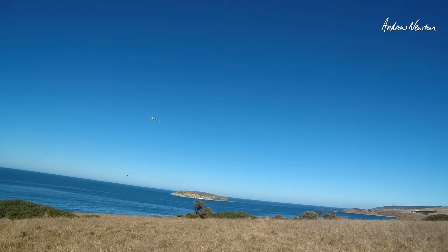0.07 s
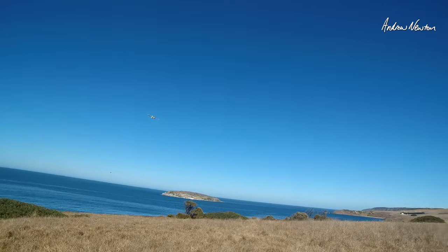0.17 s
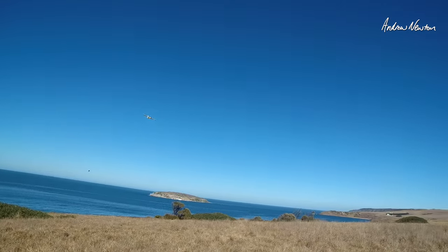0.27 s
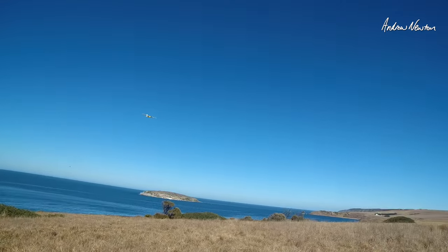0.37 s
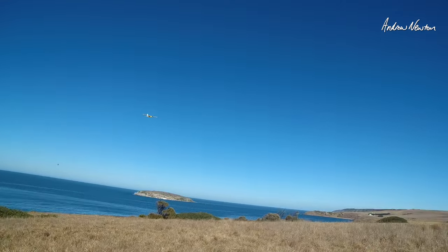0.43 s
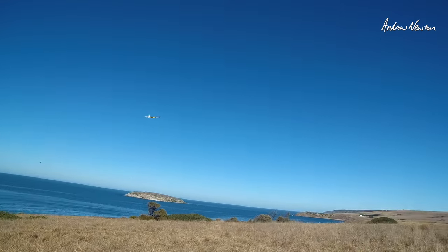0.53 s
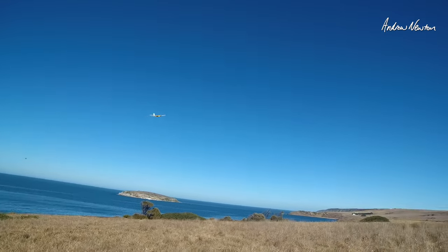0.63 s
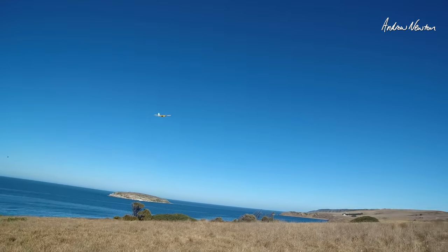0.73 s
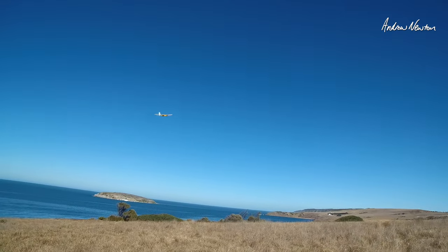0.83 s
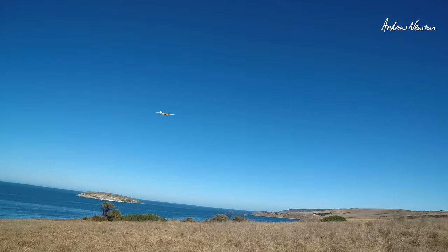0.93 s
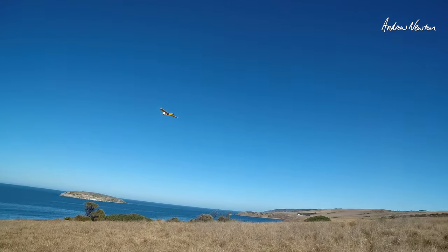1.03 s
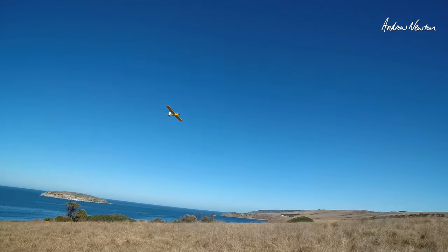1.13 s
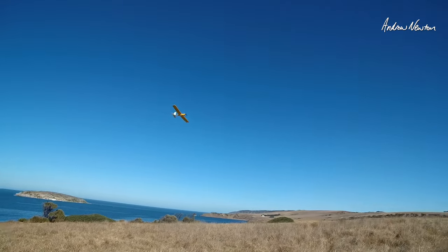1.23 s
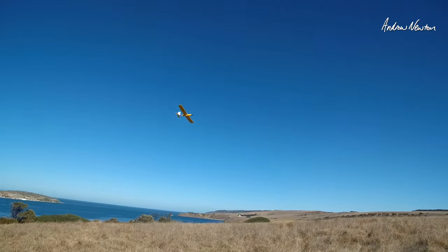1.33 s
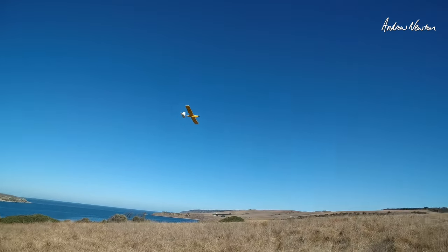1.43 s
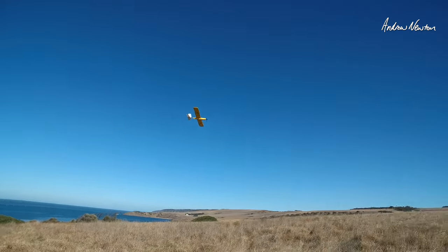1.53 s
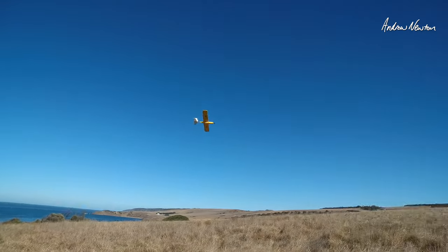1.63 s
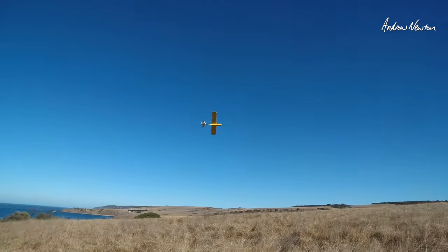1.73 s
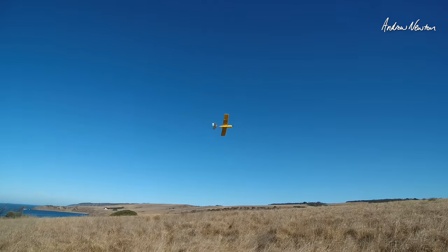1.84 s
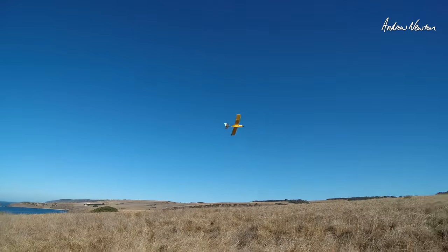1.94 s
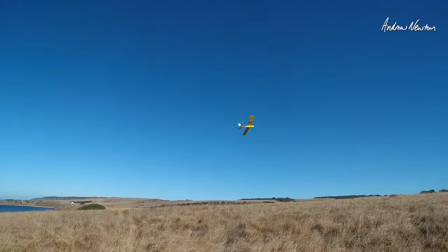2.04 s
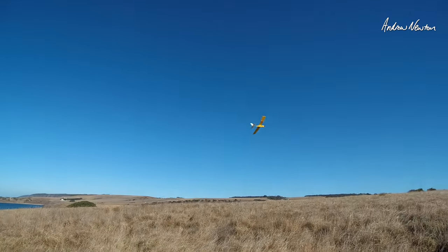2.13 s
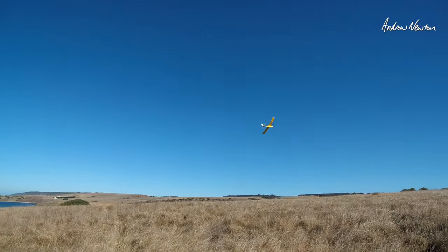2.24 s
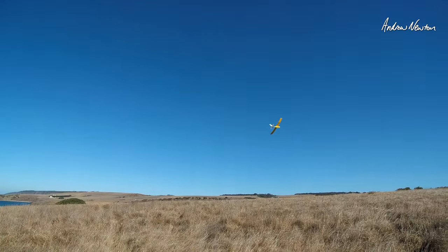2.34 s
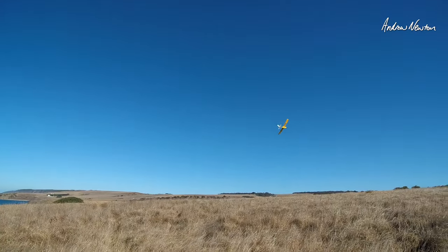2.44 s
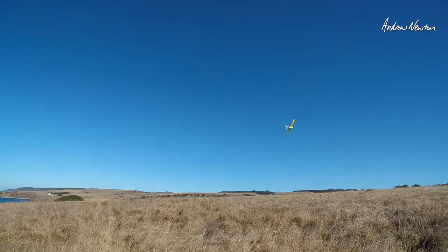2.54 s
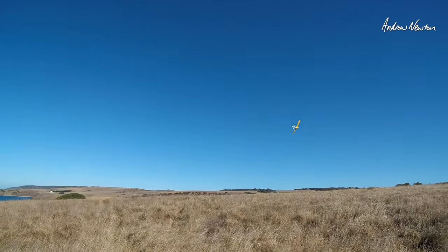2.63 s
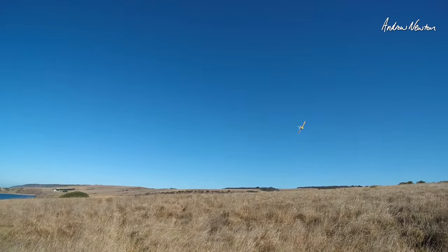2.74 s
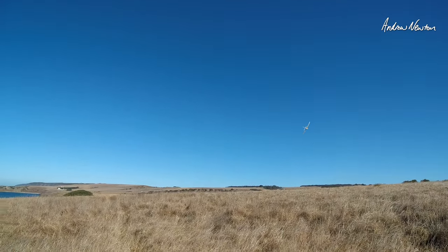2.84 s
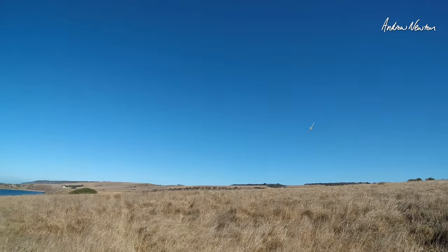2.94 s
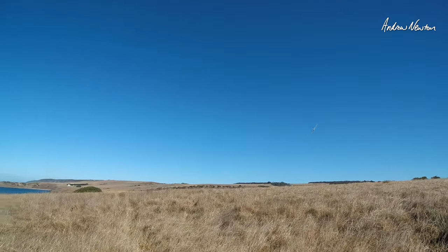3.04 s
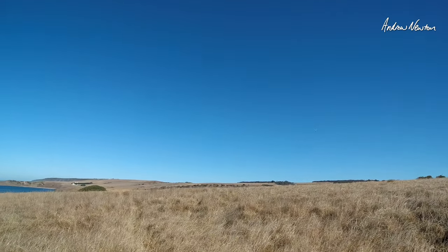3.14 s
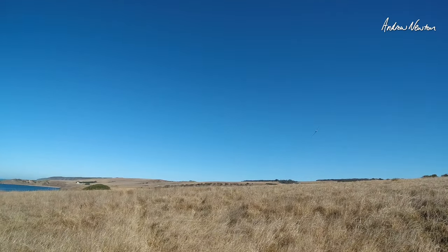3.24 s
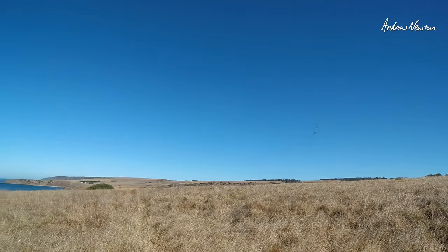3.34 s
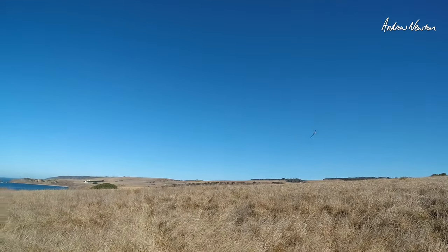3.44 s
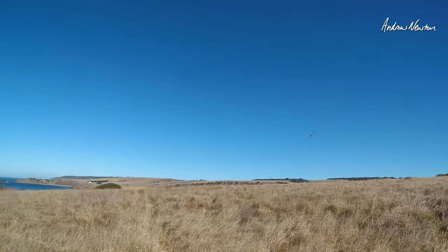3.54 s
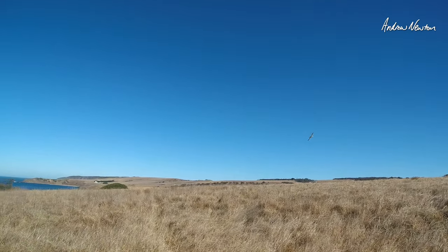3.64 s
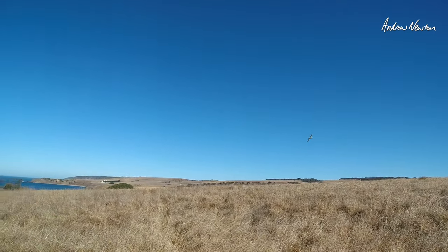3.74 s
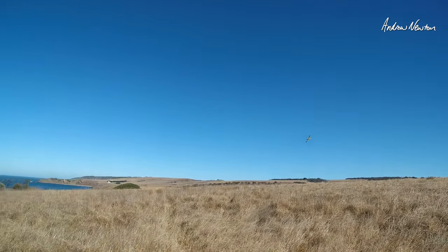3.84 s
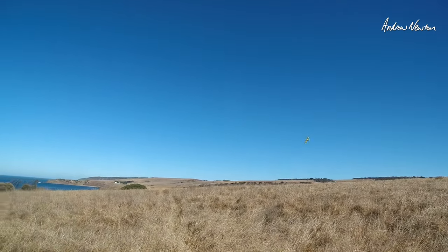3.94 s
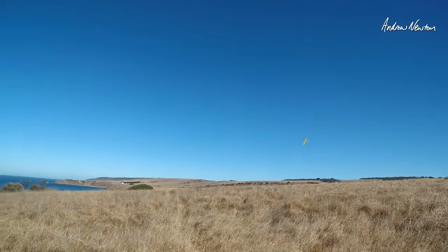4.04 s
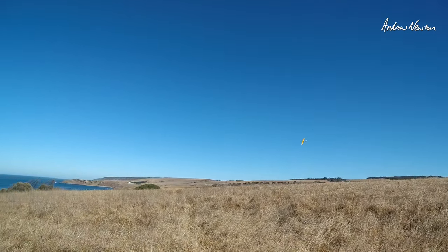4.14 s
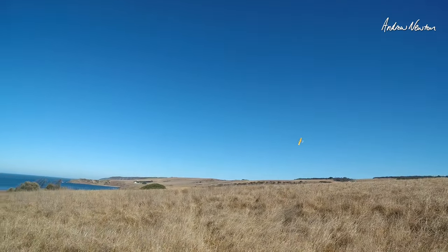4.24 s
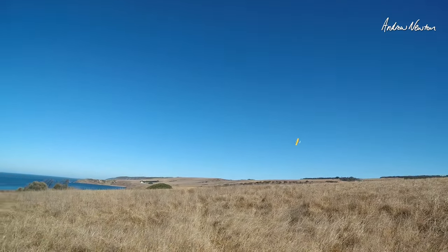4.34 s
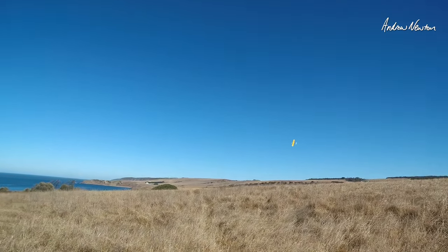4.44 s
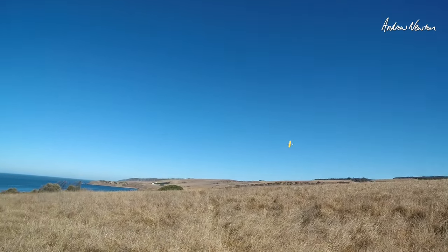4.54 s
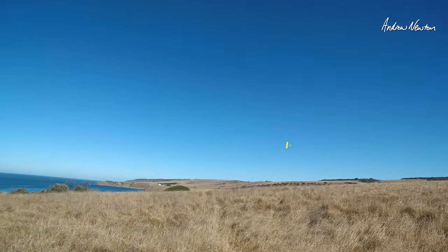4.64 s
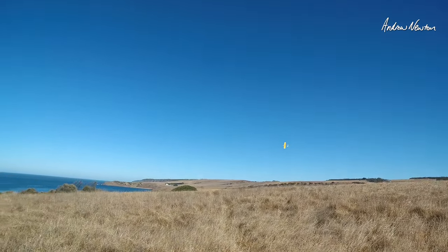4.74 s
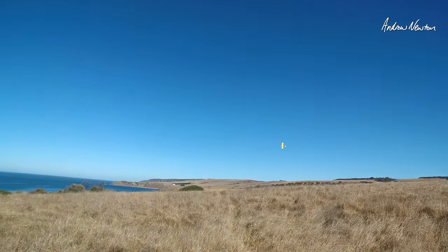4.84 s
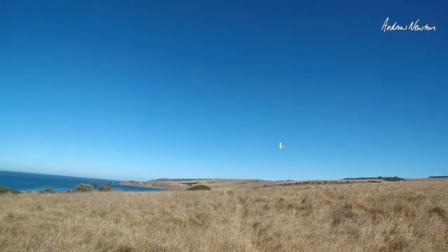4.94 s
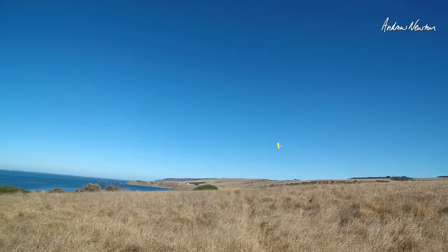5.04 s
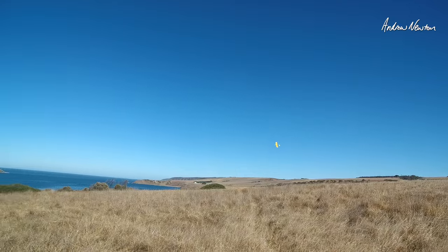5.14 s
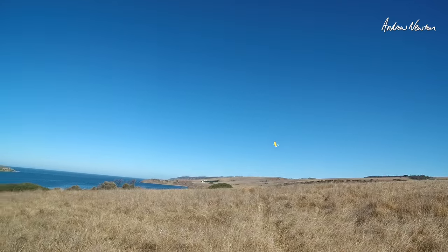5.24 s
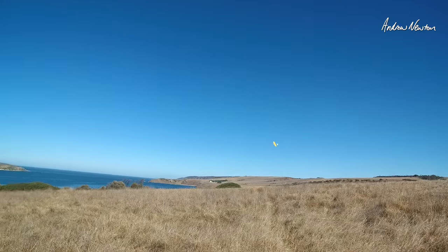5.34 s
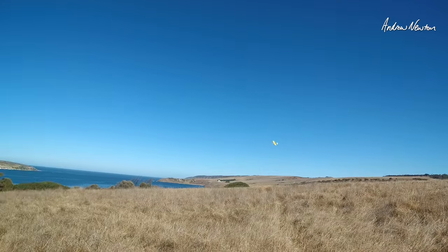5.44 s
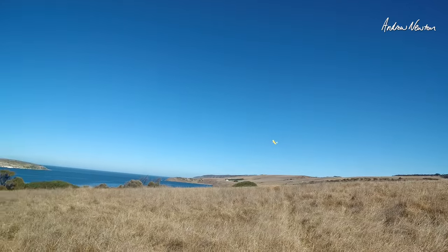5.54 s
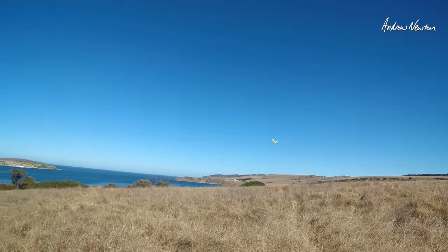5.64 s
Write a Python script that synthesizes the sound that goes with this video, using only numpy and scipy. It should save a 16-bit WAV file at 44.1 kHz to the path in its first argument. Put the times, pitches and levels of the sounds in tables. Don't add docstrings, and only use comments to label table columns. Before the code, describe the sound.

Thin electric motor whine with a faint high whistle passes and sinks in pitch, amid rumbling wind bursts, tiny chirps and soft distant surf.

```python
import sys
import numpy as np
from scipy import signal
from scipy.fft import rfft, irfft
from scipy.io import wavfile
from scipy.ndimage import uniform_filter1d

SR = 44100
rng = np.random.default_rng(int(sys.argv[2]) if len(sys.argv) > 2 else 0)


def voltage_ratio(decibels):
    exponent = np.asarray(decibels, float) / 20
    return 10 ** exponent


def dump_mix(stems):
    frames = np.atleast_2d(stems).T
    limited = np.clip(frames, -1, 1)
    pcm = np.round(limited * 32767).astype(np.int16)
    wavfile.write(sys.argv[1], SR, pcm)


N = 251370


def rms_one(x):
    return x / np.sqrt(np.mean(x ** 2) + 1e-20)


def in_time(rows):
    s, *columns = np.transpose(rows)
    return [np.interp(np.arange(N) / SR, s, column) for column in columns]


def drift(rate_hz):
    r = np.exp(-80 * np.pi * rate_hz / SR)
    coarse = rng.standard_normal(N // 40 + 2002)
    slow = signal.lfilter([1], [1, -2 * r, r * r], coarse)[2000:]
    return np.interp(np.arange(N) / 40, np.arange(len(slow)), rms_one(slow))


def swells(rows, base_db):
    t = np.arange(0, N + 64, 64) / SR
    gain = voltage_ratio(base_db) + sum(voltage_ratio(db) * np.exp(-((t - s) / half) ** 2) for s, half, db in rows)
    return np.interp(np.arange(N) / SR, t, 20 * np.log10(gain))


def tone(hz, level_db):
    turns = np.cumsum(hz) / SR + rng.random()
    return np.sqrt(2) * voltage_ratio(level_db) * np.sin(2 * np.pi * turns)


def coloured(spectrum):
    hz, db = np.transpose(spectrum)
    grid = np.maximum(np.fft.rfftfreq(N, 1 / SR), 1)
    shape_db = np.interp(np.log(grid), np.log(hz), db, -70, -70)
    return rms_one(irfft(rfft(rng.standard_normal(N)) * voltage_ratio(shape_db), N))


def pass_band(x, order, low_hz, high_hz):
    return signal.sosfilt(signal.butter(order, [low_hz, high_hz], "band", fs=SR, output="sos"), x)


def note(s, length, db, hz, swing_hz, shape):
    edge = .15
    shares, bends = np.transpose(shape)
    at = np.union1d(shares, [edge, 1 - edge])
    bend = np.interp(at, shares, bends)
    fade = np.clip(np.minimum(at, 1 - at) / edge, 0, 1)
    climb_db = 4 * swing_hz / 1000 * (bend - bend.mean())
    return np.transpose([s + length * at, hz + swing_hz * bend, db - 9 * (1 - fade) + climb_db])


def slides(rows):
    return [note(s, length, db, a_hz, b_hz - a_hz, [(0, 0), (1, 0.98)]) for s, length, a_hz, b_hz, db in rows]


def whistles(notes, waver_db):
    t, out = np.arange(N) / SR, 0
    for points in notes:
        hz, db = in_time(points)
        sounding = (t >= points[0][0]) * (t <= points[-1][0])
        out = out + tone(hz, db + waver_db * drift(30)) * sounding
    return out


# f/Hz, level/dB per Hz
FLOOR_SPECTRUM = [(60, 8), (200, -1), (400, -1.5), (800, -4), (1400, -6), (2300, -9.5), (3000, -16),
                  (4000, -20), (6000, -24), (9000, -26), (12000, -28), (15270, -24.5), (15400, -46)]
# t/s, level/dB
SURF = [(0, 0), (2, 1), (3.3, -1.5), (4.2, -.5), (5, 0.5), (5.7, 0.5)]


def surf_and_grass():
    return voltage_ratio(-56 + in_time(SURF)[0]) * coloured(FLOOR_SPECTRUM)


# t/s, half-length/s, peak level/dB
GUSTS = [(0.0, 0.18, -56), (.35, 0.17, -55.5), (1.12, 0.042, -61), (1.5, 0.033, -56), (1.62, 0.035, -41),
         (1.71, 0.084, -44), (1.82, 0.071, -38.5), (2.02, 0.056, -33), (2.13, 0.071, -35.5),
         (2.33, 0.055, -35), (2.44, 0.041, -36.5), (2.6, 0.68, -46), (2.64, 0.089, -33.5),
         (2.75, 0.026, -30), (2.83, 0.021, -32.5), (2.95, 0.062, -37), (3.11, 0.042, -36.5),
         (3.25, 0.12, -40.5), (3.46, 0.065, -37.5), (3.55, 0.033, -36.5), (3.63, .03, -38),
         (3.78, 0.061, -53), (4.06, 0.21, -55), (4.43, 0.19, -58.5), (4.9, 0.17, -53), (5.11, 0.11, -50.5),
         (5.5, 0.34, -52)]
# f/Hz, level/dB per Hz
RUMBLE = [(12, -16), (22, -3), (38, 2), (73, -2), (110, -9.5), (157, -31.5), (230, -33.5)]
# f/Hz, level/dB per Hz
FLAP = [(70, -3.5), (110, -3), (157, -5.5), (230, -19.5), (330, -22.5), (500, -76)]


def wind(lumpy_db, evenness):
    rumble_db = swells(GUSTS, -53) - .5 + 1.5 * drift(6)
    rumble = coloured(RUMBLE)
    swing = uniform_filter1d(uniform_filter1d(rumble ** 2, size=2600), size=2600)
    rumble = rms_one(rumble / (swing + 0.061) ** evenness)
    flap_db = 0.95 * rumble_db - 14.5 + lumpy_db * drift(27)
    return voltage_ratio(rumble_db) * rumble + voltage_ratio(flap_db) * coloured(FLAP)


# t/s, level/dB, low f/Hz, high f/Hz
TICK = (.8605, -6, 1300, 2100)


def tick():
    s, db, low_hz, high_hz = TICK
    hits = np.zeros(N)
    hits[round(s * SR)] = voltage_ratio(db)
    hits[round((s + .0037) * SR)] = voltage_ratio(db - 7)
    hits[round((s + .00052) * SR)] = voltage_ratio(db - 6)
    body = pass_band(hits + 1e-18, 5, low_hz, high_hz)
    crack = pass_band(np.roll(hits, 50) + 1e-18, 2, high_hz, 3600)
    thud = pass_band(hits + 1e-18, 2, 880, 1030)
    return body + voltage_ratio(-17) * crack + voltage_ratio(-5) * thud


# t/s, length/s, top f/Hz, fall f/Hz, level/dB
HOOKS = [
    (.31, .055, 5050, 1050, -75),
    (2.625, .075, 5500, 1470, -71.5),
    (2.745, .045, 4900, 700, -75),
    (3.496, .05, 5650, 1100, -76),
    (3.95, .066, 5150, 950, -77),
    (4.585, .04, 5350, 600, -77),
]
HOOK_SHAPE = [(0, -.7), (.2, -.4), (.33, 0), (.5, -.45), (.7, -.8), (.87, -1), (1, -.82)]
# t/s, length/s, bottom f/Hz, depth f/Hz, level/dB
DIPS = [
    (2.56, .058, 4460, 1340, -69),
    (3.915, .02, 3600, 200, -78),
]
DIP_SHAPE = [(0, 1), (.13, .6), (.27, .18), (.53, 0), (.7, .31), (.88, .6), (1, .95)]
# t/s, length/s, held f/Hz, droop f/Hz, level/dB
DROOPS = [
    (.98, .133, 4690, 200, -70),
    (3.562, .132, 4630, 190, -72),
]
DROOP_SHAPE = [(0, 0), (.35, 0), (.65, -.25), (1, -1)]
# t/s, length/s, from f/Hz, to f/Hz, level/dB
STRAIGHT = [
    (.255, .025, 4400, 4800, -73),
    (.425, .045, 5000, 4200, -77),
    (3.548, .022, 5300, 4580, -74),
    (4.35, .08, 4850, 4920, -82),
    (4.63, .09, 4150, 4300, -79),
    (5.64, .07, 4730, 4730, -74),
]


def birds():
    chirps = slides(STRAIGHT)
    for rows, shape in [(HOOKS, HOOK_SHAPE), (DIPS, DIP_SHAPE), (DROOPS, DROOP_SHAPE)]:
        chirps += [note(s, length, db, hz, swing_hz, shape) for s, length, hz, swing_hz, db in rows]
    return voltage_ratio(2) * whistles(chirps, waver_db=.7)


# t/s, length/s, from f/Hz, to f/Hz, level/dB
WING = [
    (1.3, .55, 7320, 7090, -81),
    (1.87, .22, 7075, 6990, -67),
    (2.07, .12, 7000, 6800, -74),
    (2.18, .3, 6810, 6520, -82),
    (2.0, .33, 2120, 1830, -68),
    (1.0, .65, 4480, 4270, -77),
    (1.29, .15, 2095, 2130, -64),
]


def wing():
    return whistles(slides(WING), waver_db=4.5)


# t/s, shaft f/Hz, controller switching f/Hz
FLIGHT = [(0.0, 125.64, 8377), (0.3, 125.3, 8363), (0.5, 124.45, 8349), (0.97, 124.8, 8324),
          (1.5, 122.29, 8147), (1.65, 121.15, 8078), (1.8, 119.4, 7971), (1.95, 118.2, 7883),
          (2.1, 116.9, 7817), (2.25, 115.27, 7786), (2.4, 113.79, 7767), (2.9, 111.85, 7740),
          (3.3, 110.93, 7743), (3.6, 113.29, 7764), (4.2, 114.46, 7849), (4.5, 117.34, 7908),
          (4.85, 118.88, 7999), (5.7, 121.55, 8168)]
# t/s, half-length/s, peak level/dB
WASH_SWELLS = [(.13, 0.16, -60.5), (.9, 0.9, -67.5), (1.62, 0.14, -51.5), (1.79, 0.095, -60.5),
               (2.02, 0.15, -61), (2.45, 0.19, -64.5), (4.6, 0.73, -76), (5.7, 0.33, -68.5)]
# f/Hz, level/dB per Hz
WASH = [(250, -14), (480, -6), (800, -4), (1350, -3), (1800, -3), (2600, -12.5), (3300, -22)]
# t/s, half-length/s, blade level/dB, tip against blade level/dB, top against blade level/dB
HISS_SWELLS = [(0.452, 0.64, -71.5, 2, -7), (1.15, 0.37, -68.5, -1.5, -8.5), (1.72, 0.49, -73.5, -3, -19),
               (2.215, 0.37, -65.5, -7.5, -8), (2.754, 0.3, -72, -8, -13), (3.59, 0.9, -76.5, -10, -8)]
# low f/Hz, high f/Hz
AIR_BANDS = [(4200, 7080), (7400, 9400), (9500, 12200)]


def propeller_air(chop, grain_db):
    shaft = in_time(FLIGHT)[0]
    blades = 1 + chop * np.sin(4 * np.pi * np.cumsum(shaft) / SR)
    wash_db = swells(WASH_SWELLS, base_db=-81)
    out = voltage_ratio(wash_db + grain_db * drift(90)) * coloured(WASH)
    s, half, blade_db, *against_db = np.transpose(HISS_SWELLS)
    for (low_hz, high_hz), db, base_db in zip(AIR_BANDS, [0, *against_db], [-95, -95, -86]):
        level_db = swells(zip(s, half, blade_db + db), base_db) + .8 * drift(7)
        out += voltage_ratio(level_db) * rms_one(pass_band(rng.standard_normal(N), 4, low_hz, high_hz))
    return blades * out


# t/s, half-length/s, peak level/dB
BLADE_BEAMS = [(.15, .12, -72.5), (.6, 0.23, -62.5), (1.0, 0.2, -63.5), (1.25, 0.14, -58),
               (1.56, 0.16, -47.5), (1.8, 0.055, -54), (2.0, 0.082, -56), (2.23, 0.083, -55),
               (2.55, .15, -75.5), (2.9, 0.054, -58), (3.24, 0.11, -68), (4.59, 0.067, -70),
               (5.0, 0.12, -72)]
# t/s, half-length/s, peak level/dB
WHINE_BEAMS = [(.05, 0.45, -53.5), (0.498, .22, -46), (0.87, 0.18, -51), (1.158, 0.17, -43),
               (1.571, 0.15, -45), (1.902, 0.11, -48), (2.16, .15, -43.5), (2.525, 0.23, -52.5),
               (3.175, 0.25, -54), (3.616, 0.11, -64), (3.876, 0.17, -59), (4.54, 0.22, -54),
               (4.87, 0.12, -59.5), (5.13, 0.13, -61), (5.5, .06, -69)]
# t/s, half-length/s, peak level/dB
WHISTLE_BEAMS = [(.1, .12, -77), (0.416, 0.18, -62.5), (.69, 0.048, -74), (1.064, 0.15, -59),
                 (1.328, 0.095, -59), (1.496, 0.11, -58.5), (1.86, 0.15, -57), (2.195, 0.19, -55),
                 (2.5, 0.091, -62), (2.694, 0.092, -60), (2.944, 0.12, -72), (3.153, 0.083, -81),
                 (3.4, 0.12, -66), (3.833, 0.21, -72.5), (4.202, 0.076, -73), (4.35, .06, -83),
                 (4.512, .08, -69.5), (4.92, 0.055, -81), (5.222, 0.17, -77), (5.7, .08, -79)]
# t/s, half-length/s, peak level/dB
BEAT28_BEAMS = [(.5, 0.11, -75.5), (.75, .17, -73), (1.2, 0.21, -64), (1.47, 0.18, -68),
                (1.707, .14, -59.5), (2.025, 0.36, -63.5), (3.86, 0.089, -86), (4.178, .15, -80.5),
                (4.356, 0.038, -79), (4.494, .04, -74), (4.62, 0.09, -70.5), (4.87, 0.2, -69),
                (5.3, 0.28, -72.5), (5.7, 0.13, -81)]
# t/s, half-length/s, peak level/dB
BEAT14_BEAMS = [(1.35, 1, -79), (2.3, .35, -82), (3.996, 0.27, -92), (5.0, .5, -88)]
# t/s, half-length/s, peak level/dB
LOWER_BEAMS = [
    [(1.85, 0.26, -61.5), (3.85, 0.61, -73)],
    [(1.64, .05, -56.5), (1.78, 0.092, -58.5), (2.1, 0.16, -57), (2.35, 0.16, -65.5), (2.7, 0.19, -64.5),
     (3.95, 0.53, -68), (4.7, .25, -75.5), (5.4, 0.12, -71)],
    [(.1, 0.19, -73), (.36, 0.16, -65.5), (.8, 0.18, -68), (1.23, 0.12, -59), (1.58, 0.076, -60),
     (1.88, .1, -57), (2.27, .15, -59), (2.8, 0.21, -68), (5.3, 0.48, -73)],
    [(.15, 0.13, -76), (.5, 0.13, -60.5), (.85, 0.17, -66), (1.15, .2, -71), (1.5, 0.15, -54.5),
     (2.08, 0.15, -56), (2.38, 0.22, -63), (3.0, 0.18, -64.5), (3.7, 0.19, -76), (4.7, 0.61, -71),
     (5.6, 0.37, -69)],
]
# t/s, half-length/s, peak level/dB
UPPER_BEAMS = [
    [(.8, .2, -80), (1.75, 0.06, -69), (2.0, 0.13, -58.5), (2.2, 0.12, -60.5), (2.58, 0.22, -66),
     (3.2, 0.6, -74.5), (4.7, 0.32, -75)],
    [(1.3, 0.09, -65), (1.86, 0.079, -64), (2.07, .1, -60), (2.37, 0.087, -59.5), (2.8, 0.15, -66.5)],
    [(.65, 0.25, -68.5), (.92, 0.13, -69), (1.2, .12, -65), (1.68, 0.057, -66), (1.9, 0.064, -68),
     (2.2, 0.1, -73), (3.0, 0.47, -74.5)],
]
# order, neighbour order, level against it/dB
FAINT = [(10, 11, -8), (18, 17, -3), (19, 16, -14), (20, 16, -15), (21, 15, -16), (22, 15, -20),
         (42, 15, -14)]
# t/s, half-length/s, depth/dB
NULLS = [(0.63, .03, -3), (1.268, 0.031, -16), (1.37, 0.021, -16), (1.657, 0.0087, -10), (1.808, 0.02, -18),
         (3.68, .03, -10)]


def motor(shimmer_db, fade_db):
    shaft, switching = in_time(FLIGHT)

    def beams_db(beams):
        return swells(beams, base_db=-94)

    whistle_db = beams_db(WHISTLE_BEAMS)
    t = np.arange(N) / SR
    for s, half, db in NULLS:
        whistle_db += db * np.exp(-((t - s) / half) ** 2)
    orders = dict(zip([4, 11, 12, 13, 15, 16, 17], map(beams_db, [*LOWER_BEAMS, *UPPER_BEAMS])))
    for order, beside, db in FAINT:
        orders[order] = orders[beside] + db + 2.0 * drift(3)
    out = tone(2 * shaft, beams_db(BLADE_BEAMS))
    out += tone(14 * shaft, beams_db(WHINE_BEAMS) + shimmer_db * drift(25))
    for turns, level_db in [(0, whistle_db), (28, beams_db(BEAT28_BEAMS)), (14, beams_db(BEAT14_BEAMS))]:
        out += tone(switching - turns * shaft, level_db + 1.53 * drift(21.0))
    for order, level_db in orders.items():
        out += tone(order * shaft, level_db + fade_db * drift(2.8))
    return out


def scene():
    around = surf_and_grass() + wind(lumpy_db=1.5, evenness=0.39) + tick() + birds()
    plane = wing() + propeller_air(chop=.18, grain_db=1.5) + motor(shimmer_db=0.52, fade_db=2.5)
    return (around + plane)[None]


def band_limit(x):
    return signal.sosfilt(signal.butter(12, 15350, fs=SR, output="sos"), x)


def record(dry):
    return band_limit(dry)


dry = scene()
out = record(dry)
dump_mix(out)
```